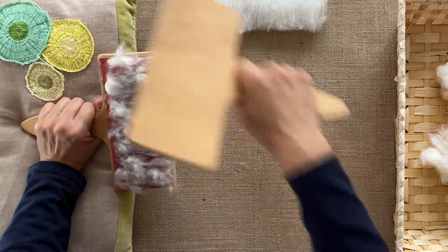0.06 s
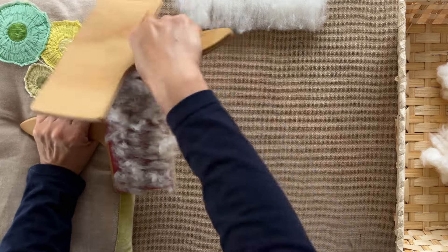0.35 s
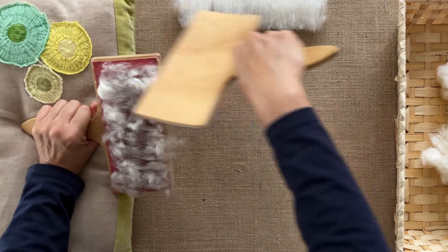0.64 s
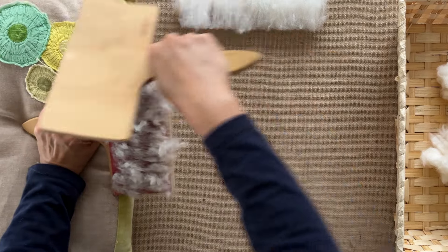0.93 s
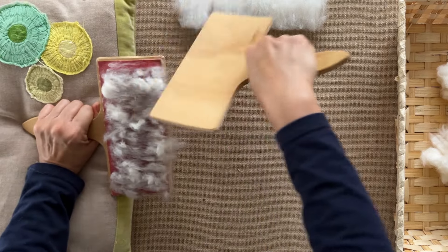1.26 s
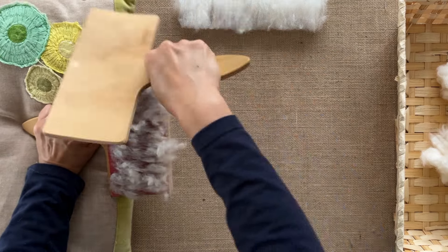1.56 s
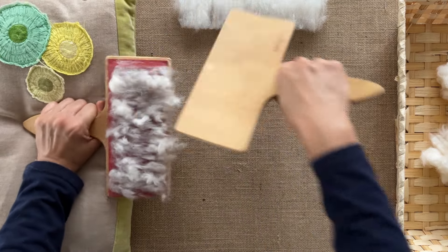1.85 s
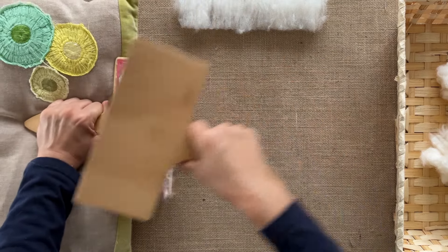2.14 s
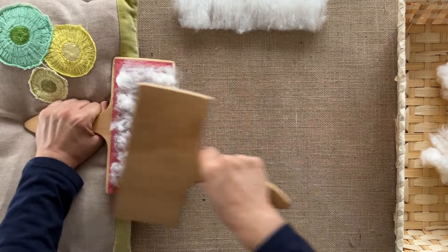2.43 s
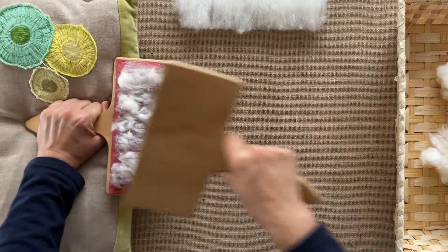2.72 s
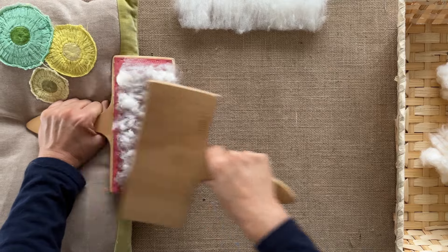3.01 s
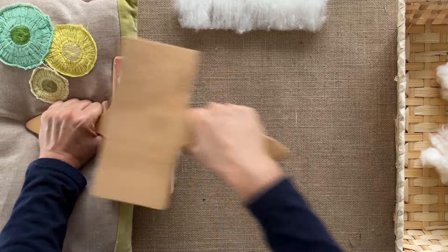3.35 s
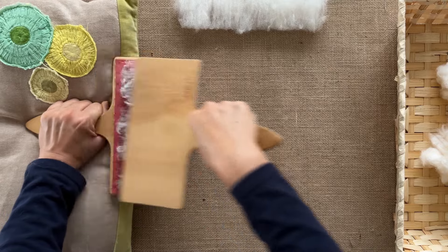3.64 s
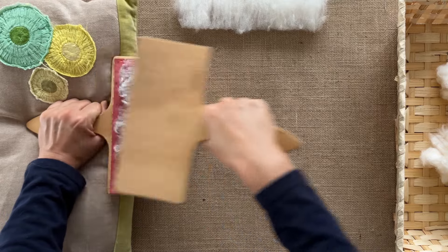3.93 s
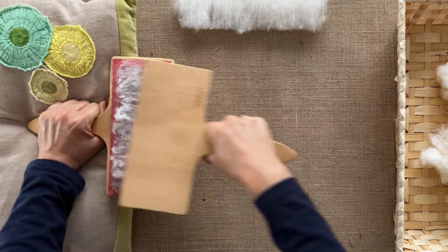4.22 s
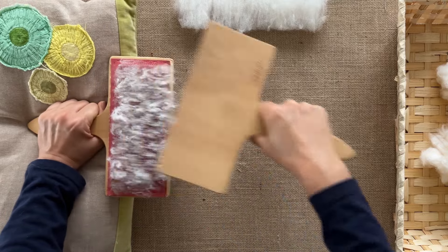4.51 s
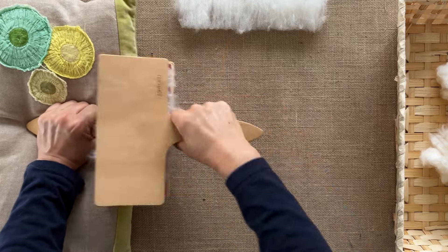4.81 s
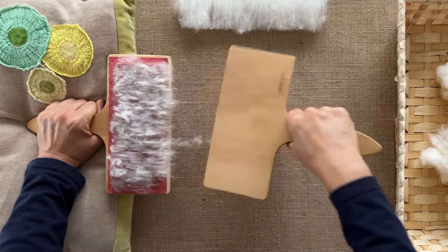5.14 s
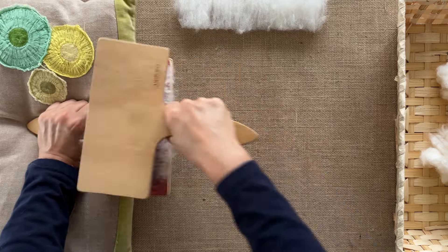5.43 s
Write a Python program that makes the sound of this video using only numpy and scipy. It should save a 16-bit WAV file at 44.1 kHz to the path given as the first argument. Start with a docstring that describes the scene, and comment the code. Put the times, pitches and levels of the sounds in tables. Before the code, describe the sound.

Wire-toothed wooden paddles tap together and rasp through cotton nine times, the later strokes softer and duller, in a quiet room.

```python
"""A sleeve rustles faintly in a small quiet room, and two wooden hand carders touch with a light tap.
Cotton is then combed between them in nine passes. The upper card lands, an impact that excites damped
resonances; its wire teeth drag through the lower ones, and stick-slip friction sets off thousands of tiny
snaps that sound the paddles and the wires. The later passes ride on the fibres and are softer and duller.
Before the eighth pass the wood clicks twice as a card is turned in the hand."""
import sys
import numpy as np
from scipy import signal
from scipy.fft import rfft, irfft, next_fast_len
from scipy.io import wavfile

SR = 44100
rng = np.random.default_rng(int(sys.argv[2]) if len(sys.argv) > 2 else 0)


def bounce(signal):
    """Save signal as a 16-bit WAV file at the path given by the first command-line argument."""
    frames = np.transpose(np.atleast_2d(signal))
    limited = np.clip(frames, -1, 1)
    pcm = np.round(limited * 32767).astype(np.int16)
    wavfile.write(sys.argv[1], SR, pcm)


N = 250047
TIME = np.arange(N) / SR


def from_db(db):
    """Amplitude ratio of a level in decibels."""
    return 10 ** (np.asarray(db) / 20)


def unit_rms(x):
    """Normalisation to unit mean power."""
    return x / np.sqrt(np.mean(x ** 2) + 1e-20)


def at_hz(curve, hz):
    """Interpolation of a curve along a logarithmic frequency axis."""
    points_hz, values = np.transpose(curve)
    return np.interp(np.log(np.maximum(hz, 1)), np.log(points_hz), values)


def bins(size):
    """Frequencies in Hz of a real Fourier transform."""
    return np.fft.rfftfreq(size, 1 / SR)


def coloured(x, spectrum):
    """Spectral shaping by a smooth gain curve, at unit power."""
    length = x.shape[-1]
    size = next_fast_len(length)
    gain = from_db(at_hz(spectrum, bins(size)))
    return unit_rms(irfft(rfft(x, size) * gain, size)[..., :length])


def resonate(x, modes):
    """Modal superposition: damped resonators summed with alternating sign, at unit power."""
    out = 0
    for k, (hz, width_hz, db) in enumerate(modes):
        radius = np.exp(-np.pi * width_hz / SR)
        poles = [1, -2 * radius * np.cos(2 * np.pi * hz / SR), radius ** 2]
        response = signal.lfilter([1, 0, -1], poles, x + 1e-18)
        out = out + (-1) ** k * from_db(db) * (1 - radius ** 2) * response
    return unit_rms(out)


def band(x, low_hz, high_hz):
    """Causal band-pass filtering, at unit power."""
    sections = signal.butter(2, [low_hz, high_hz], "band", fs=SR, output="sos")
    return unit_rms(signal.sosfilt(sections, x))


def widen(pair, coherence):
    """Partial coherence: two independent signals mix as sum and difference into left and right."""
    length = pair.shape[-1]
    size = next_fast_len(length)
    mid, side = rfft(pair, size)
    alike = np.clip(at_hz(coherence, bins(size)), 0, 1)
    left_right = np.sqrt(1 + alike) * mid + np.sqrt(1 - alike) * side * [[1], [-1]]
    return irfft(left_right, size)[:, :length]


# The room's sound field. Each row: frequency in Hz, left-right coherence from 0 to 1.
ROOM_COHERENCE = [(100, 1), (300, 0.75), (700, .45), (1300, 0.027), (4500, .15), (6000, 0.3), (11000, 1)]

def diffuse_noise(size):
    """A diffuse field: noise arriving from all sides is only partly coherent at two points."""
    return widen(rng.standard_normal((2, size)), ROOM_COHERENCE)


# Spectrum of the room tone. Each row: frequency in Hz, relative spectral level in dB.
ROOM_TONE_SPECTRUM = [(25, -25.5), (40, -18), (50, -9), (75, -20), (100, -7), (155, -9), (200, -4),
                      (420, -5.5), (680, -7), (1100, -10.5), (1700, -17), (2600, -29), (5500, -31.5),
                      (14000, -43.5)]

def room_tone(level_db=-62.5):
    """Stationary ambient noise, strongest at low frequencies."""
    return from_db(level_db) * coloured(diffuse_noise(2 ** 18)[:, :N], ROOM_TONE_SPECTRUM)


# Swings of the arm. Each row: time of the peak in seconds, level in dB before gain_db.
SWISHES = [(0.02, -67.5), (1.96, -56), (2.17, -62.5), (5.33, -85)]
# Spectrum of the rustle. Each row: frequency in Hz, relative spectral level in dB.
RUSTLE_SPECTRUM = [(300, -28.5), (1000, 0), (2200, 5), (2800, -3.5), (4300, -7.5), (5500, -12),
                   (15000, -17)]

def sleeve_rustle(gain_db=-6, floor_db=-71.5, swish_s=0.055):
    """Friction noise of sleeve and loose fibres, faint throughout and swelling as the arm swings."""
    swishes = sum(from_db(db) * np.exp(-((TIME - peak) / swish_s) ** 2) for peak, db in SWISHES)
    envelope = from_db(gain_db) * (from_db(floor_db) + swishes)
    return envelope * coloured(diffuse_noise(2 ** 18)[:, :N], RUSTLE_SPECTRUM)


# The cards touch. Each row: time in seconds, knock level in dB, knock frequency in Hz, thud level in dB,
# thud frequency in Hz, crunch level in dB, tick level in dB, spread of the contact in seconds.
# Each level is offset by its own gain in card_taps.
TAPS = [(0.1135, -57, 2150, -76, 280, -50.5, -45, 0.00071),
        (0.435, -37, 1100, -52.5, 280, -50.5, -42.5, 0.0012),
        (1.087, -36.5, 1250, -42, 268, -42.5, -42, 0.0017),
        (1.658, -36, 1010, -44.5, 282, -52, -52.5, 0.0017),
        (2.324, -38, 1690, -49.5, 318, -32, -31, 0.0015), (2.358, -56, 1650, -45, 300, -31.5, -34, 0.015),
        (3.0047, -39, 1380, -65, 330, -44, -54, 0.0012), (3.018, -39, 1390, -57, 334, -49, -50.5, 0.003),
        (3.574, -43.5, 1430, -65, 330, -61, -66, 0.0028), (4.138, -34, 1320, -43, 375, -47, -58, 0.0034),
        (4.837, -35.5, 1350, -58, 420, -49.5, -64, 0.0013),
        (5.547, -31, 1430, -41.5, 422, -45, -60, 0.0039),
        (5.553, -29.5, 1550, -37.5, 393, -55, -63, 0.0011), (5.59, -36, 1410, -48, 408, -48, -66, 0.0022)]
# The lower card on the lap. Each row: multiple of the thud frequency, bandwidth in Hz, gain in dB.
LAP_MODES = [(.7, 70, -18), (1.0, 95, 10), (1.45, 140, 0.5)]
# Bending modes of the teeth, tapped or dragged. Each row: frequency in Hz, bandwidth in Hz, gain in dB.
WIRE_MODES = [(3060, 1160, 0), (4110, 1310, 6), (4775, 1020, 1)]
# Spectrum of the tips' tick. Each row: frequency in Hz, relative spectral level in dB.
TICK_SPECTRUM = [(2500, -29), (5400, -4.5), (7500, -5), (10500, -3.5), (13500, -8.5), (16000, -13.5)]

def card_taps(thud_gain_db=-10, knock_gain_db=-14, crunch_gain_db=-13, tick_gain_db=-10):
    """Impact excitation: the lap thuds, the wood knocks, the wires crunch and their tips tick."""
    size, lead_s, push_s = 4096, 0.01, 0.0003
    cushioned_width_hz, bare_extra_hz = 230, 220
    out = np.zeros(N + size)
    t = np.arange(size) / SR - lead_s
    push = np.exp(-(t / push_s) ** 2)
    for time_s, knock_db, knock_hz, thud_db, thud_hz, crunch_db, tick_db, spread_s in TAPS:
        # The teeth engage abruptly and settle more slowly.
        age = t / spread_s
        teeth = rng.standard_normal(size) * np.exp(-np.where(age < 0, age ** 2, age))
        # A strong tick marks bare teeth, whose knock is broader in band than one cushioned by fibres.
        bareness = np.clip((tick_db - knock_db) / 3 - 0.5, 0, 1)
        knock_mode = (knock_hz, cushioned_width_hz + bareness * bare_extra_hz, 0)
        thud_modes = [(ratio * thud_hz, width_hz, db) for ratio, width_hz, db in LAP_MODES]
        thud = from_db(thud_db + thud_gain_db) * band(resonate(push, thud_modes), 150, 900)
        knock = from_db(knock_db + knock_gain_db) * band(resonate(teeth, [knock_mode]), knock_hz / 2, 2200)
        crunch = from_db(crunch_db + crunch_gain_db) * band(resonate(teeth, WIRE_MODES), 2600, 5800)
        tick = from_db(tick_db + tick_gain_db) * coloured(teeth, TICK_SPECTRUM)
        at = int((time_s - lead_s) * SR)
        out[at:at + size] += thud + knock + crunch + tick
    return out[:N]


def flutter(knots_per_s):
    """Random modulation: straight lines join normally distributed values."""
    knots = rng.standard_normal(N // 10)
    return np.interp(TIME * knots_per_s, np.arange(len(knots)), knots)


# Teeth spread over a wide card. Each row: frequency in Hz, left-right coherence from 0 to 1.
CARD_COHERENCE = [(200, 1), (700, 0.72), (1400, 0.88), (2700, 0.42), (3900, 0.58), (4900, 0.81),
                  (6000, 0.4), (9500, 0.27), (11000, .99)]

def tooth_snaps(per_s=10000, size_spread_db=3.5, slip_db=1.0, slips_per_s=450):
    """Stick-slip friction: teeth let go as random impulses, whose strength wavers as whole rows slip."""
    sizes = from_db(size_spread_db * np.minimum(rng.exponential(1, (2, N)), 4))
    signs = rng.choice([-1, 1], (2, N))
    released = rng.random((2, N)) < per_s / SR
    row_slip = from_db(slip_db * flutter(slips_per_s))
    return unit_rms(widen(sizes * signs * released * row_slip, CARD_COHERENCE))


def pull_effort(t, rest, swell, hold, release, swell_db, fade_db):
    """Envelope of a stroke in dB re full pull: the card rests, gathers speed, holds and slackens."""
    speed = np.clip((t - rest) / swell, 0, 1)
    slack = np.clip((t - rest - swell - hold) / release, 0, 1)
    return -swell_db * (1 + np.cos(np.pi * speed)) / 2 - fade_db * slack


def tooth_accent(age, attack_s=0.0021, decay_s=0.0057):
    """Transient envelope of teeth catching or lifting off: a fast rise and a slightly slower fall."""
    return np.exp(-np.where(age < 0, age / attack_s, age / decay_s) ** 2)


# Low paddle modes, damped by hand and lap. Each row: frequency in Hz, bandwidth in Hz, gain in dB.
LOW_PADDLE_MODES = [(256, 270, -14.5), (383, 135, -4), (517, 117, -1), (692, 153, -3), (869, 68, 2.5),
                    (1088, 170, -4)]
# Upper paddle modes, excited by hard contact. Each row: frequency in Hz, bandwidth in Hz, gain in dB.
UPPER_PADDLE_MODES = [(986, 97, -1), (1170, 340, -1.5), (1494, 188, 2.5), (1557, 456, -3), (2580, 93, -22)]
# Spectrum of the tips' hiss. Each row: frequency in Hz, relative spectral level in dB.
HISS_SPECTRUM = [(3000, -30), (5000, 8), (6800, 1.5), (9000, -3), (11500, -2.5), (14000, -2), (16000, -9)]
# Teeth catch during a pull or tick as the card lifts off. Each row: time in seconds, then gain in dB
# on the wood, the wires and the tips.
ACCENTS = [(0.601, -1, 2, 0), (0.677, 10, -3, -16), (1.203, -4, 5.5, 4), (1.236, 5.5, 5.5, 2),
           (1.264, 9.5, 1, 13), (1.709, 7.5, 9.5, 5), (1.784, 5.5, 3, -2), (1.81, 11, 7, 9.5),
           (2.425, 8.5, 10, 13), (2.446, 10, -1, 7.5), (2.489, 6, 6, 7), (2.566, 5.5, 4, 1),
           (2.598, 7.5, 0, 5), (3.079, 1.5, -2, 1), (3.176, 3, 10, -1), (3.633, 6, 7, 1.5),
           (3.672, 4.5, 10, 4), (3.771, 9, 9.5, 6), (4.241, 7, 3.5, -1), (4.995, 6, -0.5, -0.5)]
# The combing strokes. Each row: start, rest, swell, hold and release in seconds, base level at full pull
# in dB, depths of the swell and the release in dB, then relative weights in dB of the press on the wood,
# the bite of the wires and the hiss of the tips.
PASSES = [(0.441, 0.0, 0.15, 0.095, 0.023, -43, 11, 17, 10.5, 7.5, 6.5),
          (1.1, 0.003, 0.1, 0.044, 0.019, -40, 7.5, 5, 10, 8, 4.5),
          (1.668, 0.0, 0.1, 0.033, 0.014, -41, 12, 10, 11, 9, 7),
          (2.331, 0.078, 0.1, 0.049, 0.04, -39.5, 9.5, 4, 8.5, 4.5, -1.5),
          (2.964, 0.0013, 0.097, 0.08, 0.05, -38.5, 23, 9, 8, 3, -3),
          (3.579, 0.029, 0.062, 0.021, 0.14, -45.5, 11.5, 8, 6, -0.5, -7),
          (4.133, 0.047, 0.097, 0.083, 0.047, -42.5, 8.5, 6.5, 4.5, -3.5, -10.5),
          (4.83, 0.043, 0.13, 0.038, 0.045, -39.5, 14, 2.5, 4, -3.5, -11.5),
          (5.55, 0.044, 0.078, 0.05, 0.018, -39, 9.5, 1, 7, -1.5, -11.5)]

def combing(ease_db=5, bite_growth=0.18, hiss_growth=0.4, ring_growth=2.03, touch_s=0.003, lift_s=0.012):
    """Forced vibration: one stream of snaps drives paddle, wires and tips; a hard bite makes wires ring."""
    snaps = tooth_snaps()
    tug = flutter(knots_per_s=260)   # small tufts tug at wood and wires together
    tugged = snaps * from_db(2.5 * tug)
    low_wood = from_db(-1.12) * band(resonate(snaps, LOW_PADDLE_MODES), 120, 1210)
    upper_wood = from_db(-3.74) * band(resonate(tugged, UPPER_PADDLE_MODES), 1100, 3100)
    wires = from_db(-1.5) * band(resonate(snaps, WIRE_MODES), 2096, 5290)
    ring = from_db(-8.5) * band(resonate(tugged, [(4080, 600, 0)]), 3260, 5290)
    tips = from_db(1.06) * coloured(snaps * from_db(2.44 * tug), HISS_SPECTRUM)
    out = np.zeros((2, N))
    for start, rest, swell, hold, release, drag_db, swell_db, fade_db, press_db, bite_db, hiss_db in PASSES:
        length = rest + swell + hold + release
        near = (TIME > start - 0.03) & (TIME < start + length + 0.03)
        t = TIME[near] - start
        effort_db = pull_effort(t, rest, swell, hold, release, swell_db, fade_db)
        # The hand eases off the wood towards the end of a pull; wires and tips grow with effort.
        press_db = press_db - ease_db * np.clip((t - rest - swell) / (hold + release), 0, 1)
        bite_db = bite_db + bite_growth * effort_db
        hiss_db = hiss_db + hiss_growth * effort_db
        wood = low_wood[:, near] + from_db(press_db) * upper_wood[:, near]
        steel = from_db(bite_db) * wires[:, near] + from_db(ring_growth * bite_db) * ring[:, near]
        hiss = from_db(hiss_db) * tips[:, near]
        accents_db = sum(np.outer(db, tooth_accent(TIME[near] - time_s)) for time_s, *db in ACCENTS)
        on_wood, on_wires, on_tips = from_db(accents_db)
        contact = np.exp(-(np.minimum(t, 0) / touch_s) ** 2 - (np.maximum(t - length, 0) / lift_s) ** 2)
        envelope = contact * from_db(drag_db + effort_db)
        out[:, near] += envelope * (on_wood * wood + on_wires * steel + on_tips * hiss)
    return out


# The card is turned in the hand. Each row: start in seconds, level in dB before gain_db.
CLICKS = [(4.607, -53.5), (4.657, -54.5)]

def wood_clicks(gain_db=-12.5, mode_hz=1960, width_hz=110, tick_db=-15, contact_s=0.0013, size=4096):
    """Free vibration: a small dry contact ticks and leaves one damped mode of the wood ringing."""
    out = np.zeros(N + size)
    t = np.arange(size) / SR
    wood = unit_rms(np.sin(2 * np.pi * mode_hz * t) * np.exp(-np.pi * width_hz * t))
    for start, db in CLICKS:
        tick = band(rng.standard_normal(size) * np.exp(-t / contact_s), 2500, 12000)
        at = int(start * SR)
        out[at:at + size] += from_db(gain_db + db) * (wood + from_db(tick_db) * tick)
    return out[:N]


# Reverberation time. Each row: frequency in Hz, time to decay by 60 dB in seconds.
REVERB_TIME = [(200, 0.54), (530, 0.46), (1400, 0.43), (3700, 0.36), (9700, 0.3), (16000, 0.26)]
# Strength of the reverberation. Each row: frequency in Hz, level in dB re the direct sound.
REVERB_LEVEL = [(150, -8), (600, -2), (1500, -9), (4500, -6), (7000, -4.5), (15000, -11.5)]

def reverberation(x, build_s=0.0054, size=32768):
    """Wall reflections build up over some milliseconds, then decay exponentially band by band."""
    t, hz = np.arange(size) / SR, bins(size)
    spectrum = rfft(diffuse_noise(size)) / np.sqrt(2) * from_db(at_hz(REVERB_LEVEL, hz))
    edges_hz = np.geomspace(60, 20000, 15)
    response = 0
    for low, high in zip(edges_hz, edges_hz[1:]):
        decay = from_db(-60 * t / at_hz(REVERB_TIME, np.sqrt(low * high)))
        envelope = decay * (1 - np.exp(-(t / build_s) ** 2))
        echoes = irfft(spectrum * ((hz >= low) & (hz < high)), size)
        response = response + echoes * envelope / np.linalg.norm(envelope)
    return signal.fftconvolve(x[None], response, axes=1)[:, :N]


def scene():
    """Superposition of the cards' direct sound, its reverberation and the quiet background."""
    cards = combing() + card_taps() + wood_clicks()
    return cards + reverberation(cards.mean(axis=0)) + room_tone() + sleeve_rustle()


# Phase across the microphone pair. Each row: frequency in Hz, lead of the left channel in radians.
MIC_PHASE = [(200, 0), (600, .6), (1600, 0), (2700, -1.2), (3900, -.6), (5200, -3.1), (7000, -4.5),
             (11000, -6.25), (14000, -6.3), (16000, -7)]
# Balance of the microphone pair. Each row: frequency in Hz, left minus right level in dB.
MIC_BALANCE = [(100, .8), (600, .6), (2500, 1.8), (5000, 1.8), (9000, 4.5), (13000, .5)]

def record(dry, cutoff_hz=16100):
    """Stereo pickup: two microphones differ in phase and level, and a steep low-pass cuts the top."""
    size = next_fast_len(N + 4096)
    hz = bins(size)
    left, right = rfft(dry, size)
    lean = from_db(at_hz(MIC_BALANCE, hz) / 2)
    lag = np.exp(-1j * at_hz(MIC_PHASE, hz))
    low_pass = 1 / np.sqrt(1 + (hz / cutoff_hz) ** 160)
    pair = np.array([left * lean, right / lean * lag])
    return irfft(pair * low_pass, size)[:, :N]


dry = scene()
out = record(dry)
bounce(out)
```